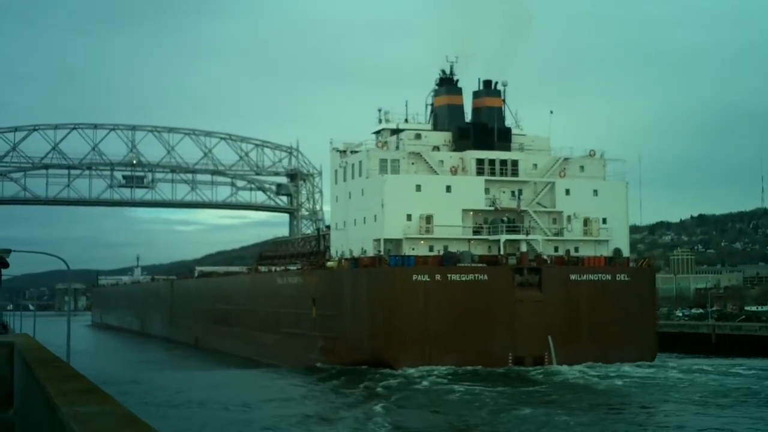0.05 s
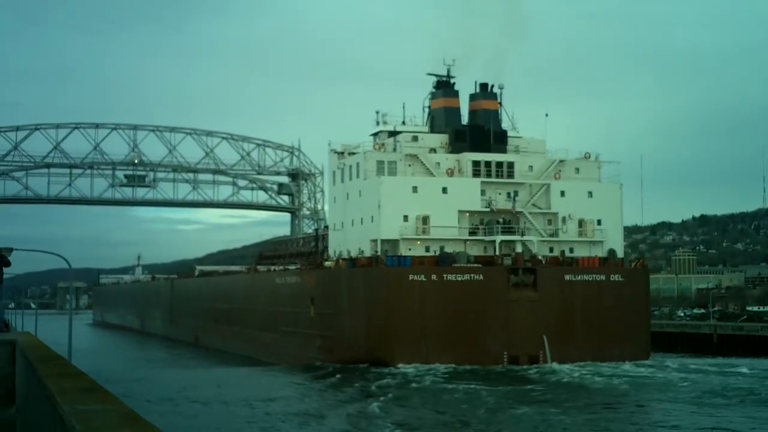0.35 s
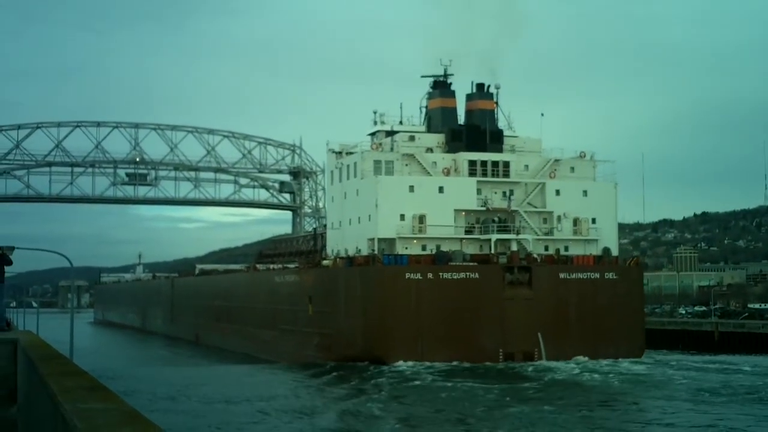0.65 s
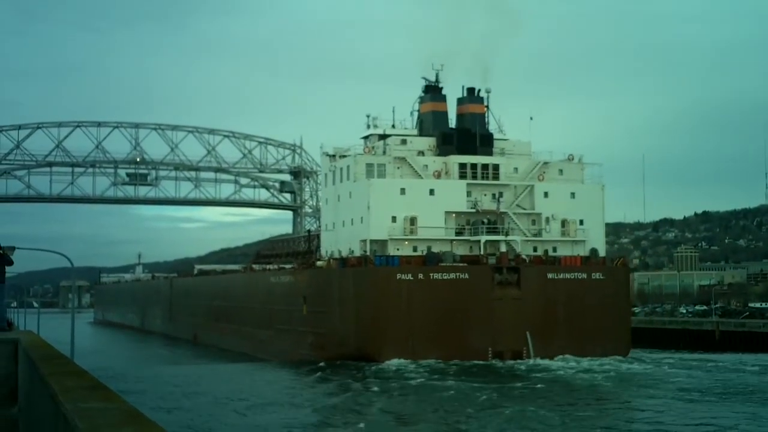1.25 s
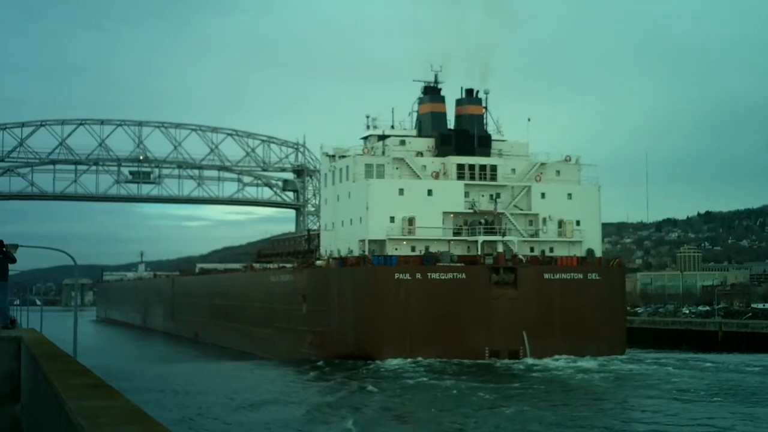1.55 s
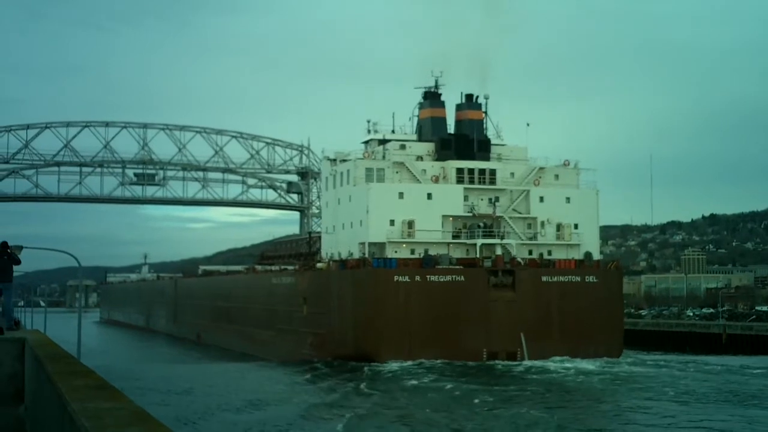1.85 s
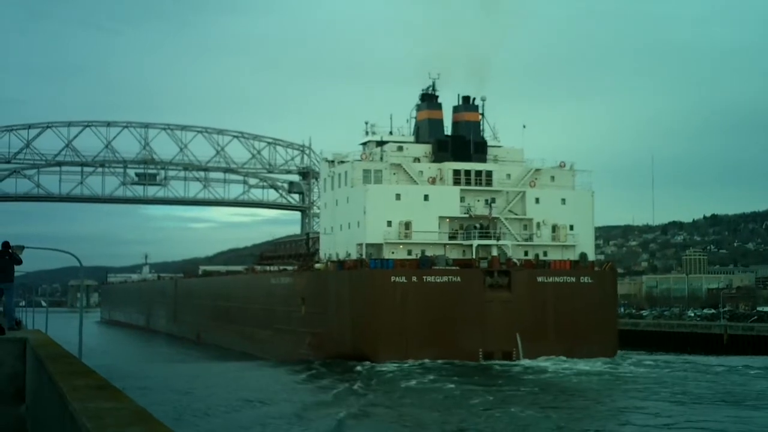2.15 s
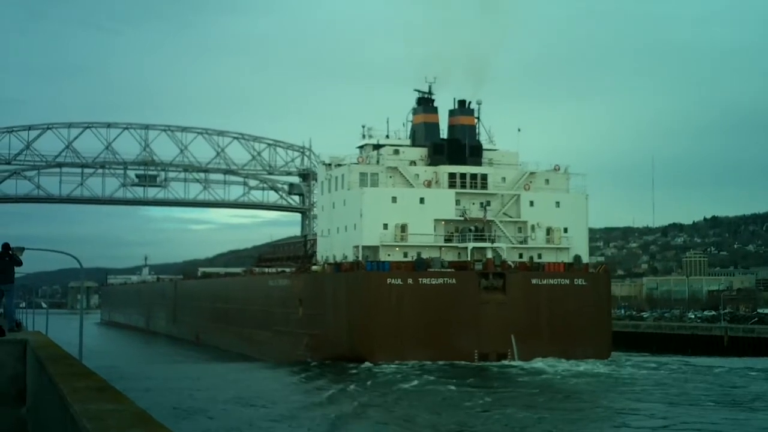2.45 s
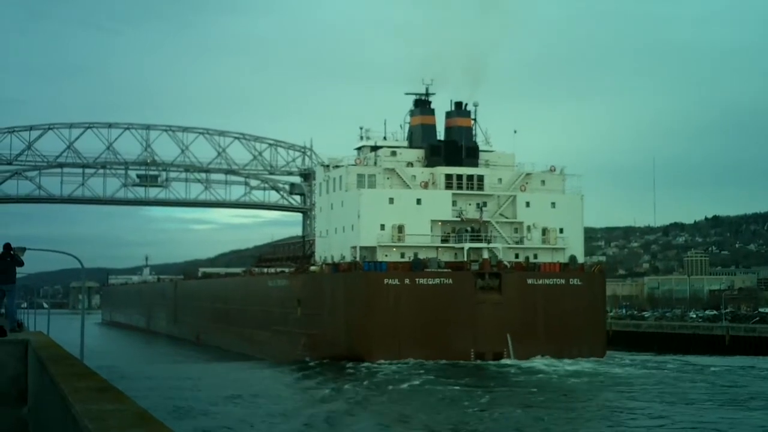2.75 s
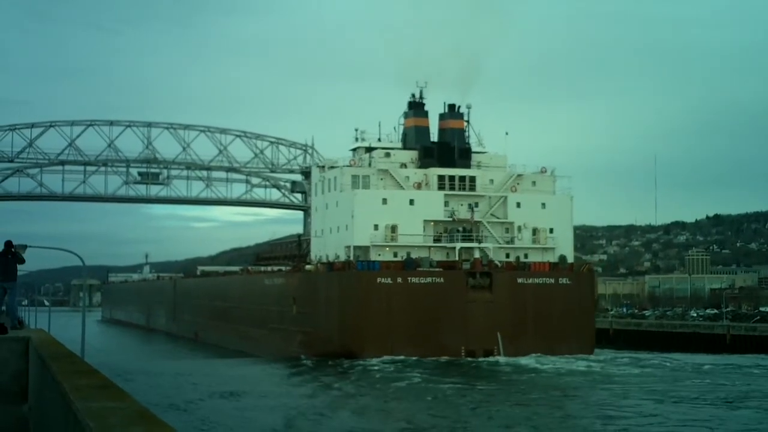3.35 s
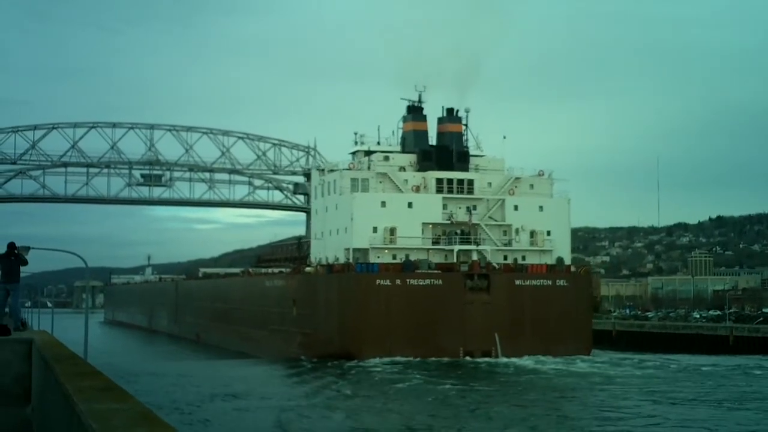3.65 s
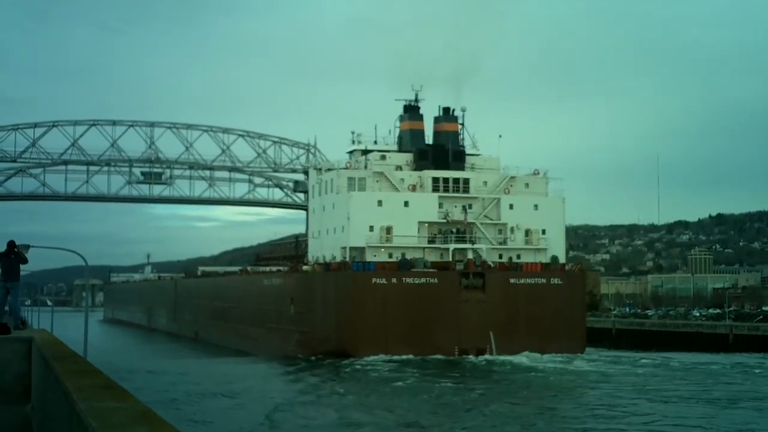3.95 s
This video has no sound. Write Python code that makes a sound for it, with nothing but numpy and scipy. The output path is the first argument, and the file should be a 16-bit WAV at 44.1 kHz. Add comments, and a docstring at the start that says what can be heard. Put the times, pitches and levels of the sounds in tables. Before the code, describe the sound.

One long, loud blast of a freighter's air horn carries across a waterway, several tones sounding together with a slight waver. It dies away into a short echo, leaving a deep engine hum and soft wind and water noise.

```python
"""Freighter's horn across a ship canal

One long blast on a chord of four air horns that share an air line and tug at each other's pitch.
As the valve shuts they go sharp, dull and die. The near bank and the shore echo the chord
over the throb of the engines and the wash of wind and water."""
import sys
import numpy as np
from scipy import signal
from scipy.fft import rfft, irfft
from scipy.io import wavfile
from scipy.ndimage import uniform_filter1d

SR = 44100
rng = np.random.default_rng(int(sys.argv[2]) if len(sys.argv) > 2 else 0)


def master_out(mix):
    """Clip the mix to full scale and print it as 16-bit PCM to the path in sys.argv[1]."""
    frames = np.transpose(np.atleast_2d(mix))
    ceiling = np.clip(frames, -1, 1)
    pcm = np.round(ceiling * 32767).astype(np.int16)
    wavfile.write(sys.argv[1], SR, pcm)


N = 176400


def amp(db):
    """Decibels to gain."""
    return 10 ** (np.asarray(db) / 20)


def unit_rms(x):
    """Scale to rms 1."""
    return x / np.sqrt(np.mean(x ** 2) + 1e-20)


def clock():
    """Sample times [s]."""
    return np.arange(N) / SR


def curve(rows, column=1):
    """Table column, interpolated in time."""
    rows = np.array(rows)
    return np.interp(clock(), rows[:, 0], rows[:, column])


def at_hz(rows, hz):
    """Table value, interpolated in log frequency."""
    f, value = np.transpose(rows)
    return np.interp(np.log(hz + 1), np.log(f + 1), value)


def wander(rate_hz, size=2048):
    """Random drift of rms 1, rolling off above rate_hz."""
    hz = np.fft.rfftfreq(size, N / SR / size)
    slow = irfft(rfft(rng.standard_normal(size)) * (hz > 0) / (1 + (hz / rate_hz) ** 2))
    return np.interp(np.arange(N), np.linspace(0, N, size), unit_rms(slow))


def noise(spectrum, patchy_db, frame=1024):
    """Coloured stereo noise of rms 1 with drifting patches."""
    # left-right likeness (frequency [Hz], correlation [1])
    likeness = [(100, 1), (400, 1), (1000, 0.99), (2000, 0.96), (3500, 0.89), (5500, .7), (9000, .15),
                (14000, 0.23)]
    hz = np.fft.rfftfreq(frame, 1 / SR)
    a, b, c, d, patches = rng.standard_normal((N // 256 + 5, len(hz), 5)).T
    patches = unit_rms(uniform_filter1d(uniform_filter1d(patches, size=10, axis=0), size=16, axis=1))
    same = at_hz(likeness, hz)[:, None]
    left = a + 1j * b
    right = same * left + np.sqrt(1 - same ** 2) * (c + 1j * d)
    bins = np.array([left, right]) * amp(at_hz(spectrum, hz)[:, None] + patchy_db * patches)
    return unit_rms(signal.istft(bins, nperseg=frame, noverlap=frame - frame // 4)[1][:, :N])


def diaphragm(hz, drift, jitter):
    """Diaphragm phase [rad]: drifts, trembles, goes sharp as the pressure drops."""
    shut_s, step_s, rise_per_step = 3.13, 0.1696, 0.02124
    rise = rise_per_step * np.clip((clock() - shut_s) / step_s, 0, 2)
    return 2 * np.pi * np.cumsum(hz * (1 + rise + drift * wander(5.6) + jitter * wander(55))) / SR


def horn(own, neighbour, tone, blow, leads, pull_rad, throb, rasp_db, end_s, fall_db_per_s):
    """Harmonics bent and pulsed at the beat with a neighbour; the top is raspiest and dies first."""
    fading_db, fading_rad = 1.49, 0.11  # moving air
    rasp_hz, rasp_db_per_oct = 38, 4.8  # turbulence
    dull_db_per_s_oct = 26
    beat = neighbour - own
    phase = own + pull_rad * np.sin(beat)
    after_s = np.maximum(clock() - end_s, 0)
    level_db, tilt = curve(blow), curve(blow, column=2)
    out = np.zeros(N)
    for k, db in enumerate(tone, 1):
        held_db = leads[k] if db is None else db + level_db + tilt * np.log2(k / np.e) + fading_db * wander(5)
        gain = amp(held_db - after_s * (fall_db_per_s + dull_db_per_s_oct * np.log2(k)))
        turn = k * phase + fading_rad * wander(18) + 2 * np.pi * rng.random()
        rasp = amp(rasp_db + rasp_db_per_oct * np.log2(k))
        out += gain * (1 + rasp * wander(rasp_hz)) * np.cos(turn)
        out += gain * rasp * wander(rasp_hz) * np.sin(turn)
    return np.sqrt(2) * out * (1 + throb * np.cos(beat))


def low_horn(own, neighbour):
    """Lowest horn; its first three harmonics swell and dip separately."""
    # harmonics 1, 2, .. (level [dB]); None: own curve
    tone = [None, None, None, -40.5, -35, -43, -42.5, -45, -52, -61, -58.5, -58, -68, -65.5, -75]
    # blowing (time [s], level [dB], tilt [dB/oct])
    blow = [(0, 0.5, -1.5), (.35, 1, -0.5), (0.599, 1, -0.5), (1, 1, 1.5), (1.45, 0, 0.5), (1.998, 1.5, 0),
            (2.3, -1, 2), (2.75, 1.5, 2), (3.14, -3.5, 3.5)]
    # fundamental (time [s], level [dB])
    root = [(0, -39.5), (.07, -42), (.13, -51.5), (.17, -44.5), (.22, -49.5), (.36, -37.5), (.78, -37),
            (.98, -41), (1.1, -36.5), (1.18, -43), (1.28, -38.5), (1.98, -38), (2.08, -50), (2.15, -40),
            (2.24, -43), (2.33, -40.5), (2.62, -40), (2.7, -44.5), (2.78, -40), (2.9, -43), (2.97, -56),
            (3.04, -46), (3.15, -44.5)]
    # leading harmonics (time [s], second [dB], third [dB])
    upper = [(0, -39, -31.5), (.2, -28.5, -32.5), (.3, -30.5, -32), (.5, -32, -31.5), (.7, -32, -30.5),
             (.8, -34.5, -32), (.98, -29.5, -31), (1.07, -32, -34), (1.2, -30, -28.5), (1.8, -29.5, -28.5),
             (1.95, -27, -36.5), (2.03, -26, -29), (2.1, -31, -39), (2.2, -27, -32), (2.4, -30, -29.5),
             (2.76, -29, -30), (2.84, -30, -40.5), (2.92, -26, -29), (2.98, -33, -38), (3.07, -27, -33),
             (3.15, -30, -30)]
    leads = {1: curve(root), 2: curve(upper), 3: curve(upper, column=2)}
    return horn(own, neighbour, tone, blow, leads,
                pull_rad=0.063, throb=0.1, rasp_db=-27, end_s=3.156, fall_db_per_s=82)


def high_horn(own, neighbour):
    """Highest horn; its fifth harmonic swells between short dips."""
    # harmonics 1, 2, .. (level [dB]); None: own curve
    tone = [-43, None, None, -42, None, -47, -53, -52, -58, -64, -70.5]
    # blowing (time [s], level [dB], tilt [dB/oct])
    blow = [(0, -0.54, 0.72), (0.699, -0.37, 0.54), (1.1, -1.3, 1.1), (1.5, -1.3, -0.41),
            (2.1, -0.61, -1.5), (2.6, -1.8, -1), (3.08, 1.7, -0.27), (3.22, 1.3, -2.3)]
    # leading harmonics (time [s], second [dB], third [dB])
    upper = [(0, -36, -30.5), (0.449, -34, -35), (.65, -41, -32), (.95, -38.5, -35), (1.15, -36.5, -32.5),
             (1.45, -36.5, -44.5), (1.8, -35, -39), (2.2, -36, -40), (2.6, -43.5, -49), (2.8, -40, -40),
             (3.06, -39.5, -42), (3.2, -32, -40), (3.24, -25, -36.5)]
    # fifth harmonic (time [s], level [dB])
    fifth = [(0, -39), (.12, -35.5), (.33, -36), (.43, -41.5), (.5, -29.5), (.6, -39.5), (.75, -33.5),
             (.88, -33), (.94, -39.5), (1.05, -34.5), (1.15, -43.5), (1.28, -38), (1.35, -38.5),
             (1.55, -35.5), (1.66, -39), (1.72, -34.5), (1.88, -32), (1.95, -37.5), (2.1, -33), (2.2, -42),
             (2.28, -32), (2.41, -38), (2.52, -30.5), (2.6, -44.5), (2.66, -34), (2.85, -33.5),
             (2.93, -36.5), (3.04, -33.5), (3.2, -35.5)]
    leads = {2: curve(upper), 3: curve(upper, column=2), 5: curve(fifth)}
    return horn(own, neighbour, tone, blow, leads,
                pull_rad=0.0085, throb=0.028, rasp_db=-27, end_s=3.212, fall_db_per_s=75.5)


def middle_horns(flat, sharp):
    """Two horns almost in tune, beating at about 5.5 Hz."""
    # flat horn's harmonics 1, 2, .. (level [dB])
    flat_tone = [-46, -42, -38.5, -45, -50.5, -51.5, -56.5, -67, -60.5, -70, -69.5, -70, -66.5]
    # sharp horn's harmonics 1, 2, .. (level [dB])
    sharp_tone = [-38, -45.5, -42.5, -42.5, -47.5, -52.5, -54, -64.5, -64, -59, -67, -73.5, -70.5]
    # blowing (time [s], level [dB], tilt [dB/oct])
    blow = [(0, 3, 1.6), (.8, 0, 1), (1.5, -1.5, 1), (1.93, 0, 0.5), (2.3, -4.5, -1.8), (3, -2, 2.4),
            (3.22, -3.5, -1.5)]
    return (horn(flat, sharp, flat_tone, blow, leads=None,
                 pull_rad=0.15, throb=0.057, rasp_db=-29, end_s=3.27, fall_db_per_s=76)
            + horn(sharp, flat, sharp_tone, blow, leads=None,
                   pull_rad=0.29, throb=0.056, rasp_db=-29, end_s=3.234, fall_db_per_s=80.5))


def chord():
    """Four coupled horns: (tones, haze)."""
    # low horn, sagging briefly (time [s], pitch [Hz])
    low_pitch = [(0, 250.8), (.05, 249), (.13, 251.3), (.28, 249.5), (.48, 251.6), (.68, 251.3),
                 (.78, 249.5), (.88, 251.4), (1, 251.9), (1.08, 250.7), (1.2, 251.6), (1.9, 251.6),
                 (2.1, 251.1), (2.2, 251.5), (2.75, 251.7), (2.92, 251.4), (3, 250), (3.08, 251.7),
                 (3.15, 252.2)]
    low = diaphragm(hz=curve(low_pitch), drift=0.00063, jitter=0.0023)
    high = diaphragm(hz=350.95, drift=0.0004, jitter=0.0008)
    flat = diaphragm(hz=288.9, drift=0.00026, jitter=0.0012)
    sharp = diaphragm(hz=294.4, drift=0.00048, jitter=0.0015)
    tones = low_horn(low, (flat + sharp) / 2) + high_horn(high, low) + middle_horns(flat, sharp)
    return tones, horn_haze(low)


def horn_haze(low_phase):
    """Noisy haze around the horns' harmonics, with a treble hiss that flares twice."""
    # body spectrum (frequency [Hz], relative density [dB])
    body_tone = [(100, -32), (200, -17.5), (280, -8), (400, -18), (520, -3.5), (800, 0.5), (1000, -3.5),
                 (1250, 1.5), (1600, -6.5), (1780, 2.5), (2300, -15), (3000, -21.5), (4200, -42.5),
                 (15000, -80)]
    # treble spectrum (frequency [Hz], relative density [dB])
    treble_tone = [(1000, -39.5), (2200, -6.5), (2800, 0), (3300, 2), (3800, -4.5), (4400, -16),
                   (5600, -17), (7200, -31.5), (10500, -32.5), (15000, -38)]
    # flare spectrum (frequency [Hz], relative density [dB])
    flare_tone = [(2000, -41), (2900, -13.5), (3250, 2), (3500, -1), (4000, -19), (6000, -25),
                  (8000, -41.5), (15000, -50)]
    # haze levels (time [s], body [dB], treble [dB])
    levels = [(0, -38, -49), (.35, -36.5, -51.5), (.8, -36.5, -52), (1.3, -47.5, -53.5), (1.7, -45, -49.5),
              (1.93, -40.5, -49.5), (2.15, -40, -53.5), (2.4, -42.5, -55), (2.9, -40.5, -55),
              (3.19, -39, -58.5)]
    # treble flares (time [s], half width [s], level [dB])
    flares = [(1.93, 0.056, -47), (2.14, .05, -50.5)]
    end_s, fall_db_per_s, chop_depth = 3.23, 64, 0.45
    fall_db = fall_db_per_s * np.maximum(clock() - end_s, 0)
    body = amp(curve(levels) - fall_db) * noise(body_tone, patchy_db=2.5)
    treble = amp(curve(levels, column=2) - fall_db) * noise(treble_tone, patchy_db=1.2)
    flare_gain = sum(amp(db) * np.exp(-((clock() - s) / width) ** 2) for s, width, db in flares)
    flare = flare_gain * noise(flare_tone, patchy_db=2.0)
    return body + (treble + flare) * (1 + chop_depth * np.cos(low_phase))


def bank_echo(x):
    """One smeared reflection off the near bank."""
    delay_s, smear_s = 0.11, 0.043
    t = np.arange(SR // 2) / SR
    taps = rng.standard_normal(len(t)) * np.exp(-((t - delay_s) / smear_s) ** 2)
    held = np.concatenate([x[SR:0:-1], x])
    return signal.fftconvolve(held, unit_rms(taps) / np.sqrt(len(t)))[SR:SR + N]


def shore_echo(x):
    """Long diffuse echo, already ringing with the held chord; treble dies first."""
    # echo decay (frequency [Hz], t60 [s])
    t60 = [(250, 10), (500, 2), (800, 2.2), (1500, 1.3), (4000, 0.44)]
    # echo colour (frequency [Hz], relative level [dB])
    colour = [(250, 6), (330, -1.5), (500, 3.5), (800, -2), (1500, -5.5), (4000, 0.5)]
    hz, t, bins = signal.stft(rng.standard_normal(SR * 3 // 2), SR, nperseg=256)
    decay = amp(at_hz(colour, hz)[:, None] - 60 * t / at_hz(t60, hz)[:, None])
    tail = signal.istft(bins * decay, SR, nperseg=256)[1]
    f = np.fft.rfftfreq(len(tail), 1 / SR)
    tail /= np.sqrt(np.mean(abs(rfft(tail))[(f > 250) & (f < 2000)] ** 2))  # unit midband gain
    held = np.concatenate([x[SR:0:-1] * np.hanning(SR), x])
    return signal.fftconvolve(held, tail)[SR:SR + N]


def engines():
    """Deep steady lines, beating into a slow throb."""
    # engine lines (multiple of the cycle rate [1], level [dB])
    lines = [(6, -41.5), (7, -43), (11, -38), (12, -42.5), (13, -61), (15, -55), (16, -52.5), (17, -43.5),
             (18, -44.5), (19, -52), (20, -57), (23, -55.5), (24.7, -57), (27, -59), (29, -59), (30, -52),
             (47.5, -61.5)]
    cycle_hz = 3.622
    turn = 2 * np.pi * np.cumsum(cycle_hz * (1 + 0.0005 * wander(0.9))) / SR
    return np.sqrt(2) * sum(amp(db + 0.5 * wander(2.2)) * np.cos(k * turn + 2 * np.pi * rng.random())
                            for k, db in lines)


def wash():
    """Steady noise of wind and water."""
    # wash spectrum (frequency [Hz], relative density [dB])
    spectrum = [(10, -7.5), (30, -2.5), (70, -9.5), (130, -3.5), (200, -7.5), (400, -9), (800, -5.5),
                (1300, -12.5), (2000, -18.5), (3000, -25), (4000, -31), (5200, -29.5), (6500, -35),
                (7500, -43.5), (10000, -42), (12000, -49.5), (15000, -50.5)]
    return amp(-43.5) * noise(spectrum, patchy_db=1)


def scene():
    """Horns and echoes over engines, wind and water."""
    left_lag_s = 2.2e-5
    tones, haze = chord()
    horns = tones + amp(-15) * bank_echo(tones) + amp(-19.5) * shore_echo(tones)
    left = np.interp(clock() - left_lag_s, clock(), horns)
    return np.array([left, horns]) + haze + engines() + wash()


def record(dry):
    """Two dips in the microphone's treble, then the band limit."""
    # microphone dips (centre [Hz], half width [Hz], depth [dB])
    dips = [(4204, 140, 16), (8280, 860, 15.5)]
    edge_hz = 15250
    padded = np.pad(dry, ((0, 0), (SR, SR)), "reflect", reflect_type="odd")
    hz = np.fft.rfftfreq(padded.shape[1], 1 / SR)
    loss_db = sum(db * np.exp(-((hz - f) / width) ** 2) for f, width, db in dips)
    heard = irfft(rfft(padded) * amp(-loss_db))
    lowpass = signal.firwin(511, edge_hz, window=("kaiser", 9), fs=SR)
    return signal.oaconvolve(heard, lowpass[None], "same")[:, SR:SR + N]


dry = scene()
out = record(dry)
master_out(out)
```